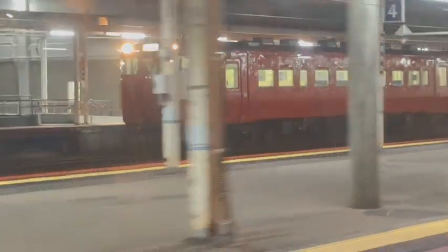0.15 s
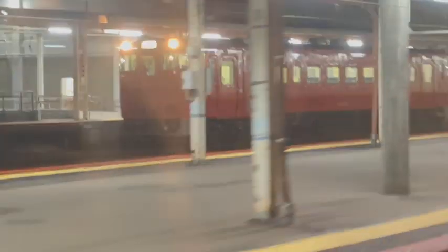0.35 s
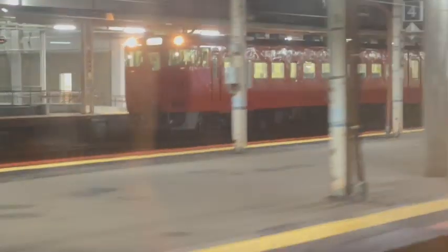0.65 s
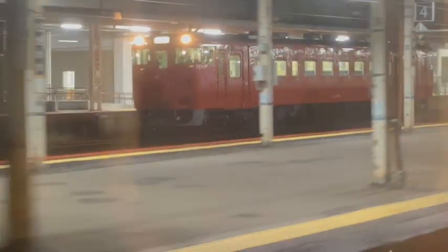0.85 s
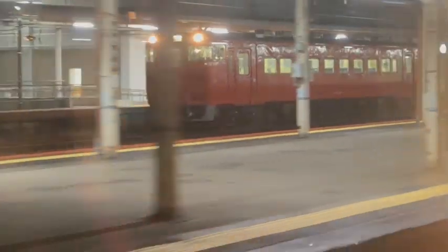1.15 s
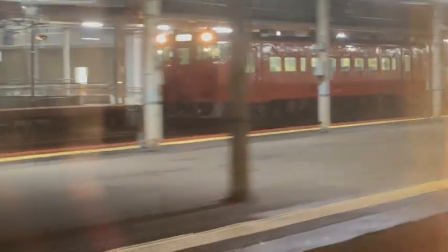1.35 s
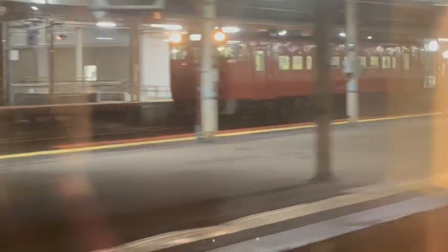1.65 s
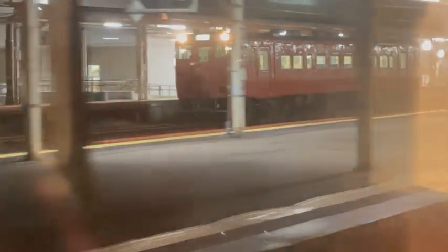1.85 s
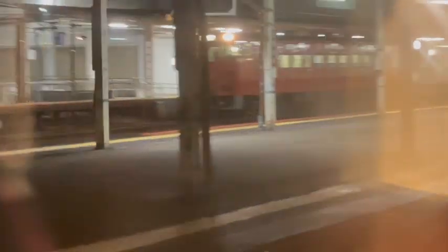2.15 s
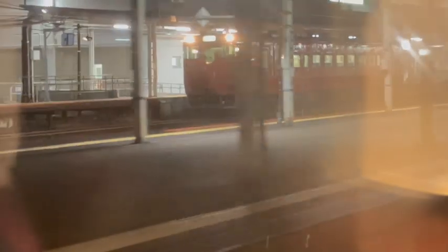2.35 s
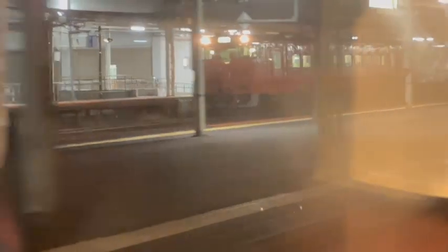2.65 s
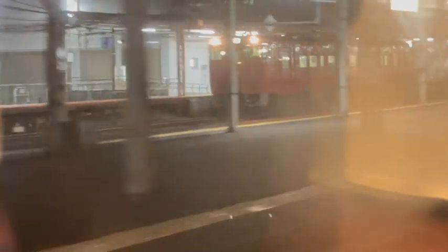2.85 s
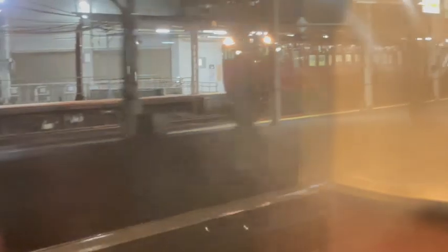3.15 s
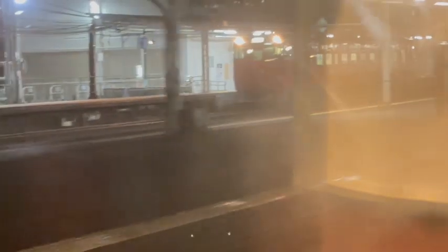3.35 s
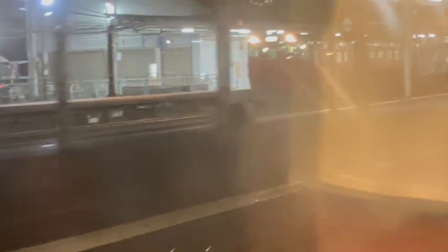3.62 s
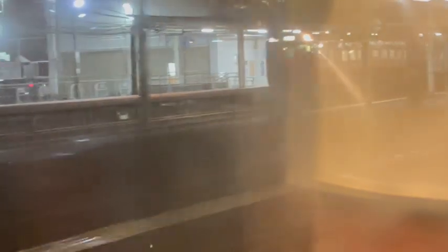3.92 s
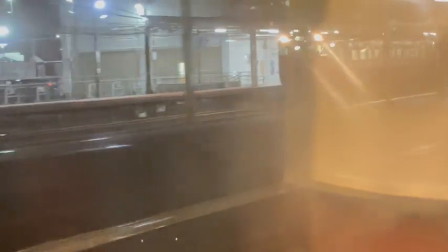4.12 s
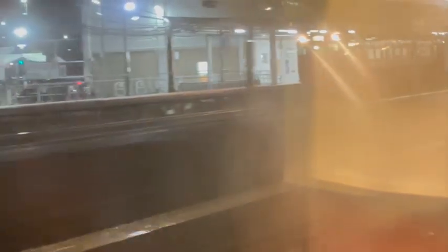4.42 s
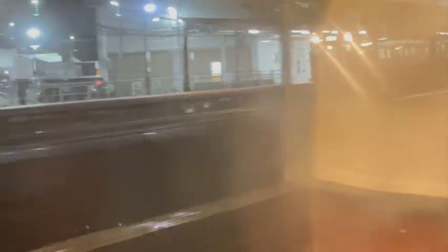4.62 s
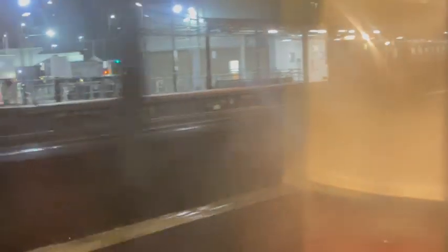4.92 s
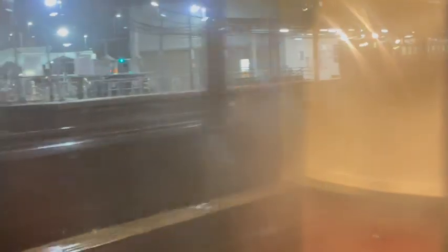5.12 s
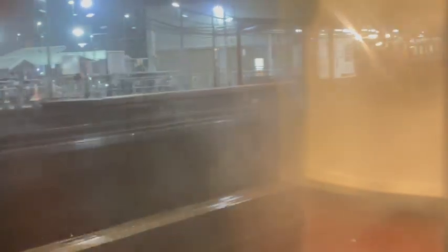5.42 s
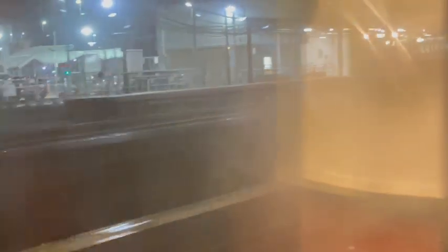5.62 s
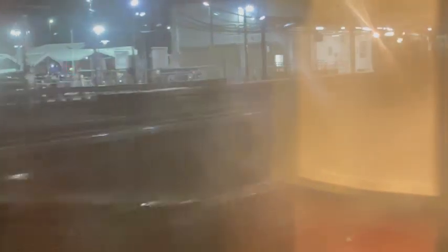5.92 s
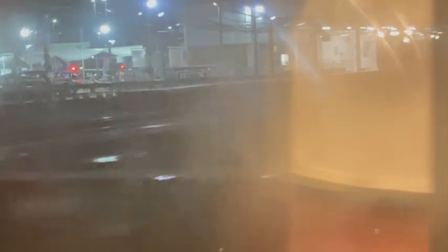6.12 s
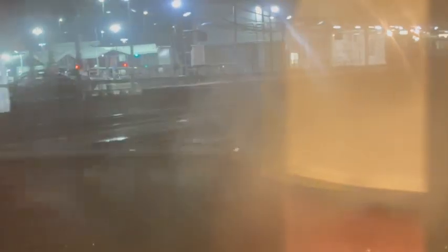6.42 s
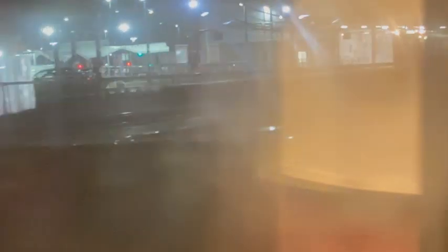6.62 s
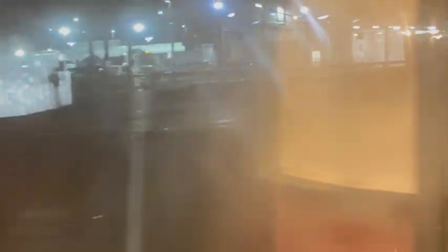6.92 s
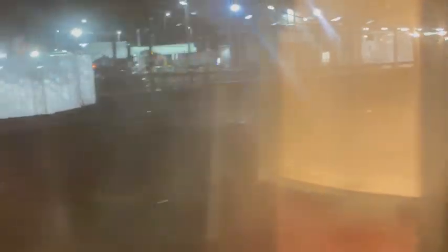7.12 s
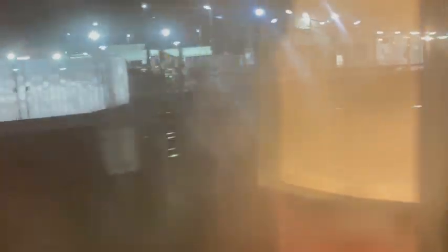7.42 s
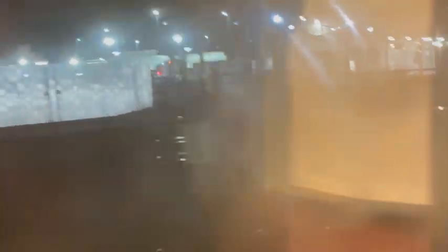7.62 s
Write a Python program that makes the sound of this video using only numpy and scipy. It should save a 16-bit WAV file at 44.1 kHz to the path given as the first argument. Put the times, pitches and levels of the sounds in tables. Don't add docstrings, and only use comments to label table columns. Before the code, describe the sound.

From inside a diesel railcar pulling out of a station, close to a window, a deep unsteady engine drone and low rolling rumble run throughout, with body heave and soft fan hiss. From 0 to 0.6 s, small plastic ticks, creaks and cloth-like rustle sit close to the microphone, with a faint thump at 0.2. Heavy dull thuds hit at 1.2 and 1.5 s, shaking floor, seat and fittings; the engine hum surges. Ticks cluster around 1.9 to 2.5 s. A softer bump comes at 3.1, then a faint air puff at 3.4. Another strong pair lands at 4.2 and 4.4 s with a swelling hum. Calmer rumble follows, with isolated ticks near 4.9 and 6.1 and a weak bump at 5.7. The final pair strikes at 6.6 and 6.8 s, a latch cracking and rattling between them at 6.75. Rumble continues, with one last tick at 7.5.

```python
import sys
import numpy as np
from scipy import signal
from scipy.fft import rfft, irfft, next_fast_len
from scipy.io import wavfile
from scipy.ndimage import uniform_filter1d

SR = 44100
rng = np.random.default_rng(int(sys.argv[2]) if len(sys.argv) > 2 else 0)


def attenuation_scalar(level_db):
    decades = np.asarray(level_db, float) / 20
    return 10 ** decades


def store_pcm(level_fs):
    pcm = np.round(np.clip(level_fs, -1, 1) * 32767).astype(np.int16)
    wavfile.write(sys.argv[1], SR, np.atleast_2d(pcm).T)


N = 342657

# start in seconds, hold in seconds, level in dB, sway pitch in Hz.
LURCHES = [(0.074, 0.073, -33.5, 73.9), (0.292, 0.047, -31, 53.4), (0.772, 0.12, -34.5, 50.9),
           (1.292, 0.13, -30, 60.17), (1.569, .06, -23, 61.6), (2.062, 0.056, -33, 65.5),
           (2.293, 0.21, -32, 49.2), (3.123, 0.23, -27.5, 56), (3.6, 0.22, -32, 61.54),
           (3.9, 0.12, -31, 50.55), (4.266, 0.06, -30.5, 70), (4.449, 0.22, -26.5, 58.07),
           (4.716, 0.07, -32, 60), (5.198, 0.1, -31.5, 59.66), (5.474, 0.06, -29.5, 52.27),
           (5.898, 0.21, -30.5, 54.6), (6.301, 0.24, -30, 55.37), (6.659, 0.093, -30.5, 61.36),
           (6.93, 0.27, -31.5, 60), (7.27, 0.1, -32, 54.85), (7.5, .07, -31.5, 55)]
CALM_DB = -36.5


def evened(x):
    return x / np.sqrt(np.mean(x ** 2) + 1e-20)


def read(points, hz):
    f, value = np.transpose(points)
    return np.interp(np.log(hz + 1), np.log(f + 1), value)


def add(mix, s, sound):
    part = mix[..., round(s * SR):][..., :sound.shape[-1]]
    part += sound[..., :part.shape[-1]]


def resonate(x, hz, width):
    turn = np.exp(2j * np.pi * hz * np.arange(x.shape[-1]) / SR)
    r = np.exp(-np.pi * width / SR)
    smooth = signal.lfilter([1 - r], [1, -r], x / turn + 1e-18)
    return 2 * (turn * smooth).real


def resonate_twice(x, hz, width):
    return resonate(resonate(x, hz, width), hz, width)


def wander(top_hz):
    t = np.arange(0, N, 256) / SR
    f, start = np.geomspace(top_hz / 20, top_hz, 20), rng.random(20)
    slow = (np.sin(2 * np.pi * (f * t[:, None] + start)) / np.sqrt(f)).sum(1)
    return np.interp(np.arange(N) / SR, t, evened(slow))


def bouts(rows, rest_db, rise, fall):
    t = np.arange(0, N + 64, 64) / SR
    start, hold, db = np.transpose(rows)[:3, :, None]
    climbing = (t - start) / rise + 1
    sinking = (start + hold - t) / fall + 1
    swell = np.clip(np.minimum(climbing, sinking), 0, 1)
    level_db = rest_db + (swell * np.maximum(db - rest_db, 0)).max(0)
    return np.interp(np.arange(N) / SR, t, level_db)


def noise(colour, patchy_db, count=N, size=2048):
    # frequency in Hz, left-right correlation from -1 to 1.
    same_points = [(25, 0.98), (60, 0.99), (99, 1), (160, 0.94), (270, 0.96), (450, 0.73), (680, -0.049),
                   (1220, 0.14), (2010, 0.19), (2800, .88), (3600, 0.92), (3950, 1), (16000, 1) ]
    # frequency in Hz, left over right in dB.
    lean_points = [(300, -0.5), (640, 2), (1400, -4), (2200, -2), (3300, 0)]
    hz = np.fft.rfftfreq(size, 1 / SR)
    a, b, c, d, patches = rng.standard_normal((count * 4 // size + 5, len(hz), 5)).T
    patches = uniform_filter1d(uniform_filter1d(patches, size=6, axis=0), size=8, axis=1)
    same = np.clip(read(same_points, hz), -1, 1)[:, None]
    left = a + 1j * b
    right = same * left + np.sqrt(1 - same ** 2) * (c + 1j * d)
    inside = (hz >= colour[0][0]) & (hz <= colour[-1][0])
    lean = attenuation_scalar(np.outer([.5, -.5], read(lean_points, hz)))
    gain = (lean * inside * attenuation_scalar(read(colour, hz)))[..., None]
    z = np.array([left, right]) * gain * attenuation_scalar(patchy_db * evened(patches))
    return evened(signal.istft(z, nperseg=size, noverlap=size * 3 // 4)[1][:, :count])


def seal():
    # start in seconds, hold in seconds, level in dB.
    puff_rows = [
        (.23, .1, -76),
        (1.72, .15, -87),
        (3.43, 0.13, -74),
        (5.11, 0.256, -77.5),
        (6.92, 0.11, -80),
    ]
    # frequency in Hz, density in dB per Hz.
    puff_colour = [(7600, -7.5), (9400, -9), (10300, 2.5), (11000, -4.5), (12000, -15)]
    # start in seconds, hold in seconds, level in dB.
    whistle_rows = [
        (.75, 0.72, -91.5),
        (3.85, .15, -92),
        (4.22, .35, -90.5),
    ]
    whistle_hz = [9950, 9550]
    puffs = attenuation_scalar(bouts(puff_rows, -100, rise=.06, fall=.08)) * noise(puff_colour, patchy_db=0.0, size=512)
    breeze = rng.standard_normal(N)
    lines = sum(attenuation_scalar(-4.0 * k) * evened(resonate(breeze, hz, 14)) for k, hz in enumerate(whistle_hz))
    return puffs + attenuation_scalar(bouts(whistle_rows, -97.0, rise=.1, fall=.1)) * lines


def ride(rumble_db, stir_db):
    # frequency in Hz, density in dB per Hz.
    roll_colour = [(15, -41), (25, -16), (40, -3), (59, -1), (92, 0), (145, -5), (201, -7), (279, -9.5),
                   (335, -10), (583, -23), (786, -30), (900, -35), (1170, -70), (1980, -120)]
    heave_colour = [(25, -26.5), (45, -10), (60, 10.5), (80, -4), (120, -4.5), (160, -9.5), (200, -37)]
    air_colour = [(350, -26), (600, -3), (856, -3.5), (1000, -3), (1080, -14.5), (1160, -7), (1650, -7.5),
                  (2970, -25), (6440, -30.5), (7300, -30.5), (9490, -65.5), (16100, -120)]
    hiss_colour = [(7600, -6), (10100, -2), (10900, -10), (12000, -13), (12500, -6), (13500, -4.5),
                   (14200, -6), (14700, -22)]
    # start in seconds, hold in seconds, depth in dB.
    lull_rows = [(.36, .1, 5), (1.08, .1, 5), (2.17, .1, 4), (2.6, .12, 2), (2.82, 0.18, 1),
                 (4.96, 0.078, 7), (5.36, .03, 3), (5.58, 0.058, 2.5), (5.84, .03, 3), (6.15, .05, 2),
                 (6.95, .25, 0.5), (7.3, 0.31, 4.5)]
    roll_db, air_db, hiss_db = -34, -53.5, -90.5
    start, hold, _, hz = np.transpose(LURCHES)
    lull = attenuation_scalar(-bouts(lull_rows, 0, rise=0.029, fall=0.02))
    lurch_db = rumble_db - CALM_DB
    sway_hz = np.interp(np.arange(N) / SR, start + hold / 2, hz) * (1 + 0.0606 * wander(8.0))
    sway = attenuation_scalar(1.3 * lurch_db - 42.0) * np.sin(2 * np.pi * np.cumsum(sway_hz) / SR)
    heave = attenuation_scalar(CALM_DB + 0.87 * lurch_db - 3.5) * noise(heave_colour, patchy_db=-1.5, size=4096)
    roll_level = attenuation_scalar(roll_db + 0.08 * (rumble_db - rumble_db.mean())) * lull ** 0.42
    roll = roll_level * noise(roll_colour, patchy_db=1.0, size=4096)
    air = attenuation_scalar(air_db + 0.13 * (stir_db - stir_db.mean())) * noise(air_colour, patchy_db=2.0)
    hiss = attenuation_scalar(hiss_db) * noise(hiss_colour, patchy_db=-0.8)
    return lull * (sway + heave) + roll + air + hiss


def rustle(stir_db):
    # frequency in Hz, density in dB per Hz.
    rub_colour = [(3000, -3.5), (6000, -3), (7800, 0), (10200, -6), (10900, -7), (12000, -21.5),
                  (14500, -24), (15600, -40.5)]
    slips_per_s, slip_fade_s = 150, 0.0019
    slips = attenuation_scalar(5.4 * np.minimum(rng.exponential(1, N), 4)) * (rng.random(N) < slips_per_s / SR)
    flicker = 0.8 + 0.4 * signal.lfilter([1], [1, -np.exp(-1 / (slip_fade_s * SR))], slips)
    return attenuation_scalar(stir_db + 3.5) * flicker * noise(rub_colour, patchy_db=4.5, size=512)


def spray():
    # start in seconds, hold in seconds, level in dB.
    spray_rows = [
        (.22, 0.076, -84),
        (1.245, 0.063, -66),
        (1.53, 0.061, -62),
        (4.235, .04, -74),
        (4.435, 0.045, -68.5),
        (6.63, 0.051, -69.5),
        (6.805, 0.049, -63.5),
    ]
    # frequency in Hz, density in dB per Hz.
    spray_colour = [(1200, 1.5), (2500, -1.5), (4000, -3), (6800, -8.5), (7300, -12.5)]
    level_db = bouts(spray_rows, -81.5, rise=0.026, fall=0.085)
    return attenuation_scalar(level_db) * noise(spray_colour, patchy_db=1.5, size=512)


def sing(rows, rest_db, rise, fall):
    start, hold, _, hz = np.transpose(rows)
    pitch_hz = np.interp(np.arange(N) / SR, start + hold / 2, hz)
    level = attenuation_scalar(bouts(rows, rest_db, rise, fall) + 0.5 + 1.6 * wander(15.0))
    return level * np.sin(2 * np.pi * np.cumsum(pitch_hz) / SR + .9 * wander(18.0))


def panels():
    # start in seconds, hold in seconds, level in dB, pitch in Hz.
    side_rows = [(.02, 0.032, -40, 335), (.28, 0.055, -55, 326.2), (.52, 0.079, -43, 331),
                 (.95, 0.079, -46.5, 338), (1.23, 0.08, -45, 340), (1.4, 0.043, -42, 332),
                 (1.52, .06, -31, 329), (1.72, .08, -42, 333.2), (1.95, 0.16, -45, 325.7),
                 (2.5, 0.52, -44, 338.7), (3.08, 0.47, -43, 329.5), (3.8, 0.077, -45.5, 342.9),
                 (4.22, 0.11, -38.5, 340.2), (4.4, 0.12, -38.5, 328), (4.6, 0.038, -38.5, 335),
                 (4.72, .12, -42.5, 331), (5.06, 0.079, -40, 331.5), (5.3, .4, -44.5, 334),
                 (5.86, 0.083, -41.5, 334.1), (6.08, 0.12, -39.5, 337.5), (6.35, 0.24, -44.5, 337.5),
                 (6.7, 0.045, -47, 330.7), (7.12, 0.1, -38.5, 332), (7.3, 0.12, -40.5, 334),
                 (7.55, 0.034, -41.5, 320)]
    floor_rows = [(.08, .03, -42, 150), (.56, 0.034, -36, 148), (.85, 0.055, -37.5, 140),
                  (1.24, .04, -31, 160), (1.36, 0.088, -34, 135), (1.53, .05, -29, 150),
                  (2.52, 0.055, -35, 148), (2.78, 0.044, -40, 146), (3.12, 0.034, -31.5, 148),
                  (3.42, 0.11, -34.5, 150), (3.74, 0.045, -35.5, 145), (3.94, .04, -42, 145),
                  (4.46, 0.024, -26, 130), (5.05, .04, -35, 145), (5.28, .05, -43, 140),
                  (6.62, .04, -28, 155), (6.8, 0.029, -24.5, 138)]
    seat_rows = [(.28, 0.025, -39, 250), (1.13, .03, -41.5, 274), (1.24, 0.053, -31, 238.8),
                 (1.53, .03, -31, 215.8), (1.7, 0.025, -34, 251.8), (2.47, 0.045, -40, 262),
                 (3.09, 0.029, -44, 254.7), (4.03, 0.078, -43, 283), (4.43, .04, -31, 241.5),
                 (5.94, .04, -39, 260), (6.8, .05, -33, 250)]
    side = sing(side_rows, -53, rise=0.033, fall=0.041)
    floor = sing(floor_rows, -48, rise=0.028, fall=0.058)
    seat = sing(seat_rows, -54.5, rise=0.018, fall=0.044)
    return side + floor + seat


def joints():
    # time in seconds, blow in dB, bass share in dB, floor ring in Hz, ring share in dB.
    blows = [(0.228, -30, -1, 205.4, -13), (1.224, -18, 1.5, 173.5, -9.5), (1.435, -29, -3, 105, 7),
             (1.514, -14.5, -9, 165.6, -21), (1.545, -20.5, 4.5, 105.3, -4), (1.757, -31, -17, 163, 4),
             (2.098, -31.5, 0, 193, 4), (3.089, -25.5, -11.5, 186.9, -5), (4.22, -16, -14.5, 181, -17.5),
             (4.434, -18.5, -4, 248.2, -16.5), (5.68, -30.5, -9.5, 140, 10.5),
             (6.619, -14.5, -6.5, 198.3, -12), (6.797, -14, -4.5, 137.5, -24), (6.864, -21, -12, 303, -7.5)]
    # frequency in Hz, density in dB per Hz.
    middle_colour = [(110, -13), (170, 4.5), (260, -3.5), (400, -5), (480, -14), (650, -27)]
    bass_colour = [(40, -11.5), (65, -7.5), (110, 6), (150, -23)]
    top_colour = [(500, -8.5), (700, 13.5), (1500, -11), (4000, -26), (7000, -34.5)]
    out, t = np.zeros((2, N)), np.arange(SR // 3) / SR
    fade_out = 1 - (t / t[-1]) ** 4
    knock_turns = np.cumsum(263 * (1 + .7 * np.exp(-t / 0.015))) / SR
    knock = np.sin(2 * np.pi * knock_turns) * np.minimum(t / 0.0056, 1) * attenuation_scalar(-60 * t / 0.046)
    for s, db, bass_db, ring_hz, ring_db in blows:
        t60 = 0.51 * attenuation_scalar(0.56 * bass_db)
        top_db = -38 - db + 0.39 * (db + 20.5)
        layers = [(middle_colour, 0, 0.014 * attenuation_scalar(0.2 * bass_db), 1),
                  (bass_colour, bass_db - 4.0, .03, 1.5),
                  (top_colour, top_db, .009, .75)]
        for colour, share_db, rise, last in layers:
            shape = (1 - np.exp(-t / rise)) * attenuation_scalar(-60 * t / (last * t60)) * fade_out
            burst = evened(shape * noise(colour, patchy_db=2.0, count=len(t)))
            add(out, s, attenuation_scalar(db + share_db - 5.0) * burst * np.sqrt(np.mean(shape ** 2)))
        ring_shape = (1 - np.exp(-t / 0.01)) * attenuation_scalar(-60 * t / (1.54 * t60)) * fade_out
        ring = ring_shape * np.sin(2 * np.pi * ring_hz * t)
        add(out, s, attenuation_scalar(db + ring_db) * ring + attenuation_scalar(db - 8.5 - 0.33 * bass_db) * knock)
    return out


def ticks():
    # time in seconds, level, low share, bright share and knock share in dB.
    sharp = [(0.115, -45, 4, -32, -2.5), (0.22, -42, 4, -21.5, 1), (0.277, -50.5, 3, -30, -2),
             (0.3549, -39, -3.5, -35, 0.5), (0.595, -48.5, 9, -31, 1), (1.1222, -43, 2.5, -50, 4),
             (1.6319, -42, 2, -41.5, -3.5), (1.878, -48.5, 10, -35.5, 1), (1.889, -48, -11, -36, 3.5),
             (1.902, -51, -2, -43, 4), (1.9307, -41.5, -17, -42, -1.5), (1.948, -47, 6, -43, 4),
             (2.1018, -41.5, 0, -32, -2.5), (2.124, -48, 6.5, -31.5, 2.5), (2.151, -51, 6.5, -34.5, 5),
             (2.159, -43, 7, -41, 3.5), (2.1827, -44.5, 9.5, -38, 1), (2.2075, -48, -5, -46, -4.5),
             (2.374, -44.5, -3, -41, 4), (2.4494, -46.5, 11, -52, 4.5), (3.026, -39, -12, -28, -2),
             (3.4312, -45, 1, -45, 4), (3.904, -39, -7, -26, 0), (4.856, -36.5, -4.5, -24, 1),
             (5.0839, -46, 2, -36, 0.5), (5.5723, -49.5, 10, -42, -1.5), (6.074, -43.5, 5, -38, -1),
             (6.337, -50, 12, -28.5, 3.5), (7.515, -36, -5, -22.5, -1.5)]
    # time in seconds, level in dB.
    creaks = [(0.0089, -58), (0.2343, -61.5), (0.2894, -65), (0.397, -56), (0.4385, -57.5), (0.461, -54.5),
              (0.5226, -53), (0.5442, -54.5), (0.5745, -52.5), (1.2393, -66), (1.5405, -50), (1.5657, -49),
              (1.7419, -50.5), (1.8209, -61.5), (1.848, -53), (1.8633, -52.5), (2.106, -58), (2.193, -52.5),
              (4.4315, -62.5), (5.864, -56)]
    # time in seconds, level in dB, low share in
    # dB.
    more_creaks = [(.249, -52, -6), (.262, -56, 6), (0.297, -58, 14), (0.4662, -60.5, 19), (0.4875, -57, 14.5),
                   (.4977, -59.5, 16), (0.5995, -47, 11), (2.1066, -47.5, 3), (2.116, -56.5, -4),
                   (2.133, -54, -7), (2.142, -55.5, 0), (2.169, -55, -7)]
    # frequency in Hz, width in Hz, level in dB.
    trim = [(2960, 850, 0), (3590, 310, -6), (4275, 440, 0), (5500, 350, -9.5), (6920, 760, 5),
            (8050, 640, -1), (9900, 1700, -1.5)]
    out, t = np.zeros((2, N)), np.arange(2000) / SR
    faint = [(*row, 13) for row in creaks] + more_creaks
    for s, db, low_db, bright_db, knock_db in sharp + [(*row, -32, 3.0) for row in faint]:
        a, b, c = rng.standard_normal((3, len(t)))
        aftershocks = 0.069 * np.exp(-t / 0.0021) + 0.01 * np.exp(-t / 0.013)
        slip = aftershocks * np.minimum(t / 0.0011, 1) * b
        slip[40] += 1
        modes = []
        for k, (hz, width, mode_db) in enumerate(trim):
            modes.append(attenuation_scalar(mode_db + 1.1 * a[k]) * resonate_twice(slip, hz, width) / width)
        body = attenuation_scalar(knock_db - 2.0) * sum(modes[:3]) - sum(modes[3:])
        bright = resonate_twice(slip * np.exp(-t / .004), 13300, 4200)
        other_side = 0.68 * slip + 0.26 * c * np.exp(-t / 0.0021)
        low = np.array([resonate_twice(v, 1300, 870) for v in (slip, other_side)])
        tick = body / abs(body).max() + attenuation_scalar(bright_db + 14.0) * bright / abs(bright).max()
        tail = attenuation_scalar(0.62 * low_db + 2.5) * low / abs(low[0]).max()
        add(out, s + .0003, attenuation_scalar(db - 0.5) * (tick + tail))
    return out


def snap():
    # frequency in Hz, density in dB per Hz.
    rattle_colour = [(400, 6), (1000, 3), (2000, 3.5), (2500, -7), (3200, -13), (4200, -12), (6000, -14.5),
                     (8400, -16.5), (10500, -18), (11500, -24)]
    fizz_colour = [(11800, -3), (13500, 0), (15300, 0), (16000, -8.5)]
    snap_s, drag_s, stop_s = 6.744, .008, 0.043
    snap_db, fizz_db = -37.5, -21
    out, t = np.zeros((2, N)), np.arange(SR // 5) / SR - drag_s
    caught = 1 - 0.5 / (1 + np.exp(-(t - stop_s) / .003))
    decay = attenuation_scalar(-60 * t / .22) * caught + 0.18 * attenuation_scalar(-60 * t / 0.43) * (1 - t / t[-1])
    tail = np.clip(t / 0.0034, 0, 1) * decay
    rattle = noise(rattle_colour, patchy_db=0.6, count=len(t), size=256)
    rattle = 0.53 * rattle[0] + 0.71 * rattle
    dull = uniform_filter1d(rattle, size=9)
    drag = 0.35 * np.clip(1 + t / drag_s, 0, 1) ** .4 * (t < 0)
    crack = 2.6 * np.exp(-((t - .0042) / 0.0016) ** 2)
    knock = 1.05 * np.exp(-((t - .0064) / 0.0016) ** 2)
    latch = 0.8 * tail * (rattle - 0.2 * dull) + crack * (rattle - dull) + (knock + drag) * dull
    add(out, snap_s - drag_s, attenuation_scalar(snap_db) * latch)
    burst = 1.2 * np.exp(-((t - .003) / 0.0033) ** 2)
    fizz_shape = np.clip(t / .0015, 0, 1) * (.8 * attenuation_scalar(-60 * t / .24) * caught + burst)
    fizz = fizz_shape * noise(fizz_colour, patchy_db=5.5, count=len(t), size=256)[0]
    add(out, snap_s - drag_s, attenuation_scalar(snap_db + fizz_db) * fizz)
    return out


def engine(firing_db, hum_db):
    # multiple of the shaft rate, level in dB.
    orders = [(1, -48.5), (3, -53), (7, -62.5), (18, -69.5)]
    # frequency in Hz, width in Hz, level in dB.
    body_panels = [(332, 19, -56.5), (901.5, 32, -65.5), (1074, 32, -63.5), (1685, 280, -65)]
    shaft_hz = 48.44
    turns = np.cumsum(shaft_hz * (1 + 0.00408 * wander(3.0))) / SR
    drone = np.zeros(N)
    for k, db in orders:
        tone = np.sqrt(2) * np.sin(2 * np.pi * (k * turns + rng.random()))
        drone += attenuation_scalar(db + 3.84 * wander(5.5)) * tone
    firing = attenuation_scalar(firing_db + 0.5 + 2.0 * wander(14.0)) * np.sin(4 * np.pi * turns + 1.14 * wander(12.0))
    shake = noise([(20, 0.0054), (3000, 0.0043)], patchy_db=1.5)
    fuzz = evened(resonate_twice(shake, 192.9, 15))
    fourth = np.sin(8 * np.pi * turns + 0.83 * wander(8.0))
    hum = attenuation_scalar(hum_db - 3.0) * (0.84 * fourth + 0.72 * fuzz)
    ringing = sum(attenuation_scalar(db) * evened(resonate_twice(shake, hz, width)) for hz, width, db in body_panels)
    return drone + firing + hum + ringing


def scene():
    # start in seconds, hold in seconds, level in dB.
    surges = [(.12, 0.033, -36), (.52, 0.03, -35), (.75, 0.032, -43), (1.1, 0.065, -40), (1.36, 0.1, -25.5),
              (1.565, 0.034, -31.5), (1.62, .02, -34), (1.68, 0.17, -34.5), (2.07, 0.033, -30.5),
              (2.6, 0.1, -33.5), (2.98, .05, -36.5), (3.3, 0.1, -34.5), (3.48, 0.057, -32),
              (4.25, 0.072, -25.5), (4.4, 0.093, -26.5), (4.62, 0.27, -40), (5.25, 0.083, -37),
              (5.68, 0.041, -30.5), (5.93, 0.048, -29.5), (6.28, 0.051, -42), (6.5, 0.065, -32.5),
              (6.85, 0.25, -32.5), (7.15, 0.3, -38.5)]
    hums = [(0, 0.031, -27), (.3, 0.091, -39.5), (.55, .06, -39.5), (.75, 0.13, -38), (.97, 0.13, -34),
            (1.52, 0.21, -37), (1.86, 0.1, -31), (2.1, 0.1, -34.5), (2.37, 0.26, -31.5), (2.7, 0.3, -35.5),
            (3.11, 0.026, -26), (3.3, .08, -34.5), (3.6, 0.77, -38), (4.255, 0.06, -21), (4.35, 0.098, -25),
            (4.6, 0.025, -35.5), (4.92, 0.11, -39), (5.1, 0.14, -40.5), (5.42, 0.17, -36.5),
            (5.8, 0.4, -36.5), (6.3, 0.27, -36), (7.64, 0.049, -39.5)]
    stirs = [(0, 0.014, -72), (.21, 0.089, -75.5), (.45, 0.14, -82), (1.22, .15, -84), (1.54, 0.4, -76),
             (2.1, 0.087, -77), (3.42, 0.1, -83), (4.25, 0.2, -87), (5.1, 0.18, -85), (6.04, 0.063, -79.5),
             (6.63, 0.044, -85), (6.9, .14, -84.5)]
    rumble_db = bouts(LURCHES, CALM_DB, rise=0.084, fall=0.084) + 1.4 * wander(5.3)
    firing_db = bouts(surges, -47.5, rise=0.048, fall=0.2) + 1.2 * wander(6.0)
    hum_db = bouts(hums, -48, rise=0.064, fall=0.17) + 1.1 * wander(6.8)
    stir_db = bouts(stirs, -91, rise=0.032, fall=0.054) + 1.4 * wander(5.0)
    background = seal() + ride(rumble_db, stir_db) + rustle(stir_db) + spray()
    knocks = panels() + joints() + ticks() + snap()
    return background + knocks + engine(firing_db, hum_db)


def phased(sound):
    # frequency in Hz, left-over-right phase lead in radians.
    lead_points = [(2000, 0), (3000, .55), (3650, .45), (3950, .02), (6650, .02), (6950, 1.0), (7450, 3.15),
                   (8100, 5.4), (8350, 6.26), (8950, 6.26), (9250, 5.5), (10300, 3.8), (11150, 3.14),
                   (12100, 3.0), (12600, 1.5), (13200, .5), (13700, 0)]
    size = next_fast_len(N + 2048)
    lead_rad = read(lead_points, np.fft.rfftfreq(size, 1 / SR))
    turn = np.exp(.5j * np.outer([1, -1], lead_rad))
    padded = np.pad(sound, ((0, 0), (0, size - N)), "linear_ramp")
    return irfft(rfft(padded) * turn, size)[:, :N]


def top_cut(x):
    return signal.sosfilt(signal.butter(12, 16200, fs=SR, output="sos"), x)


def record(dry):
    held = 0.42 * np.tanh(dry / 0.38)
    held *= np.minimum(np.arange(N) / 150, 1)
    return top_cut(phased(held))


dry = scene()
out = record(dry)
store_pcm(out)
```